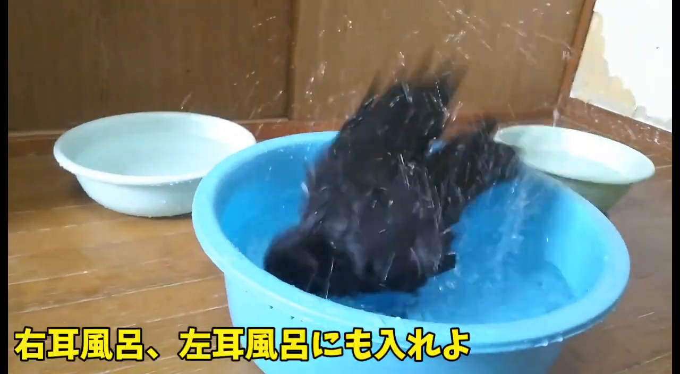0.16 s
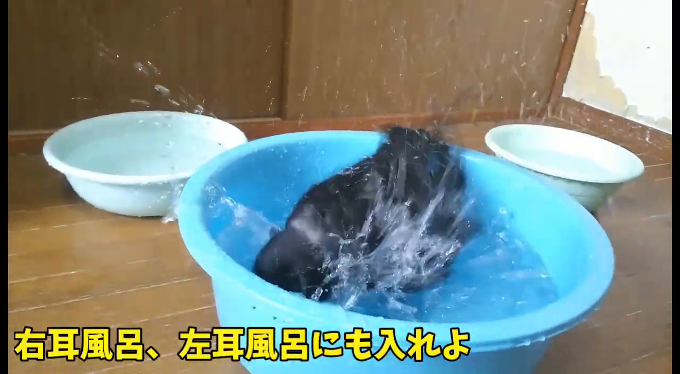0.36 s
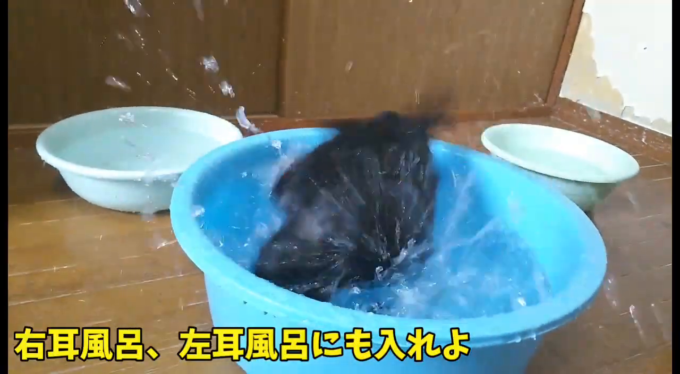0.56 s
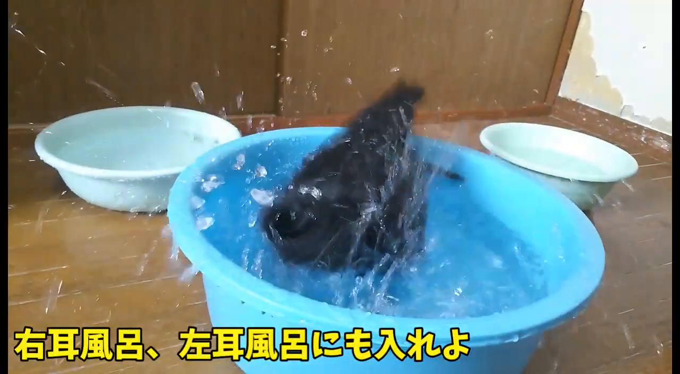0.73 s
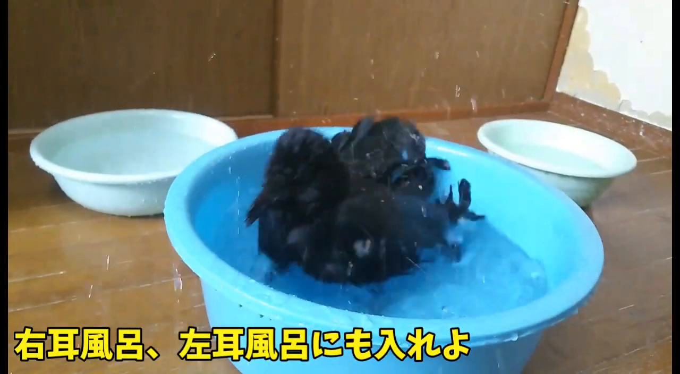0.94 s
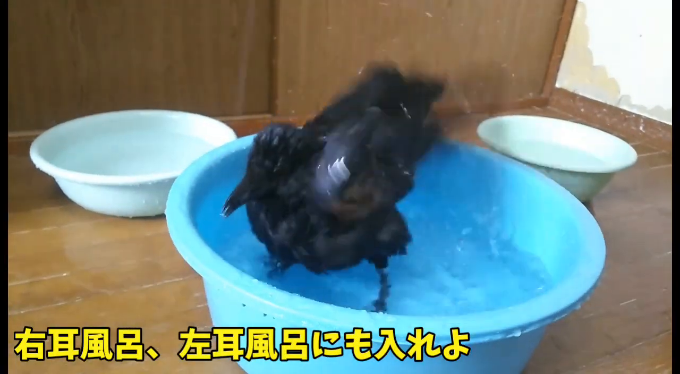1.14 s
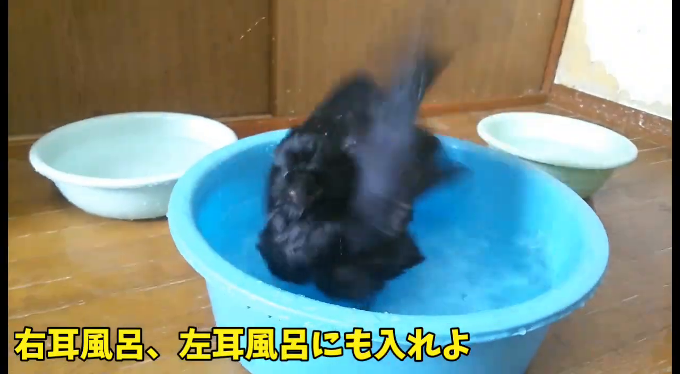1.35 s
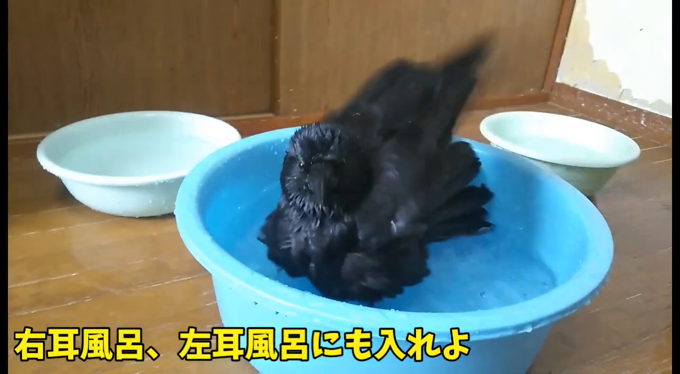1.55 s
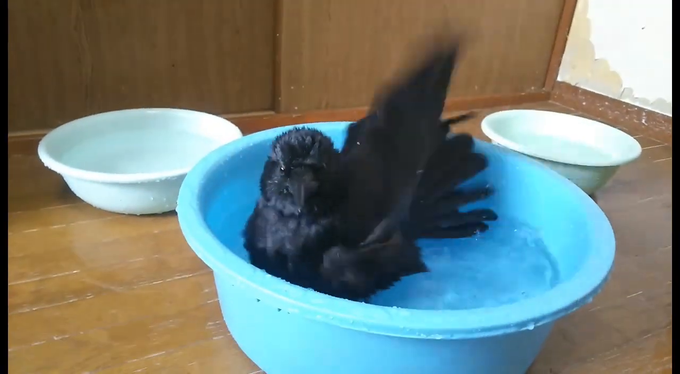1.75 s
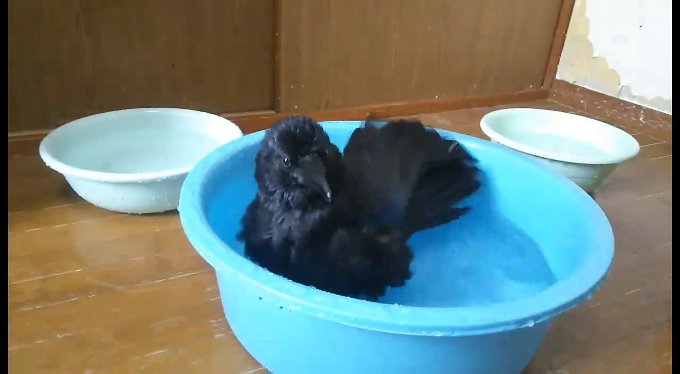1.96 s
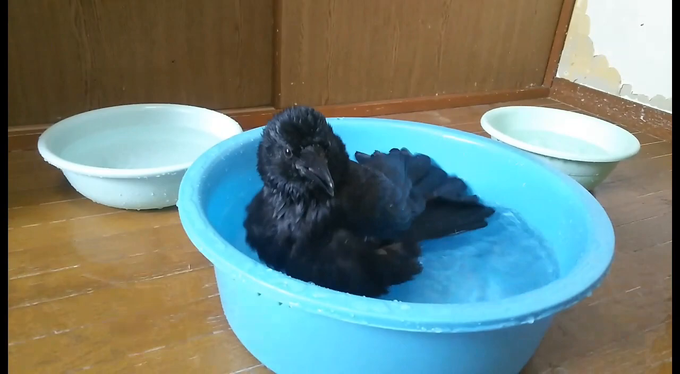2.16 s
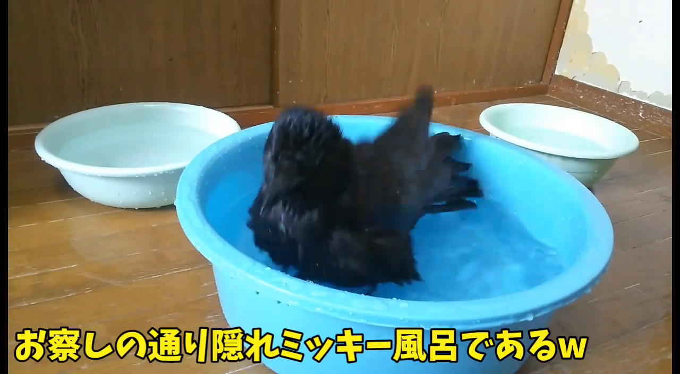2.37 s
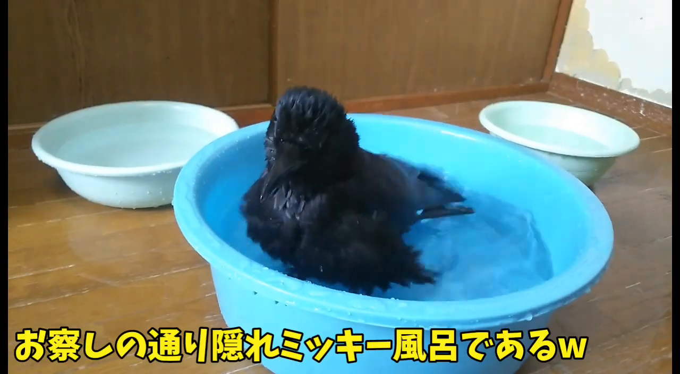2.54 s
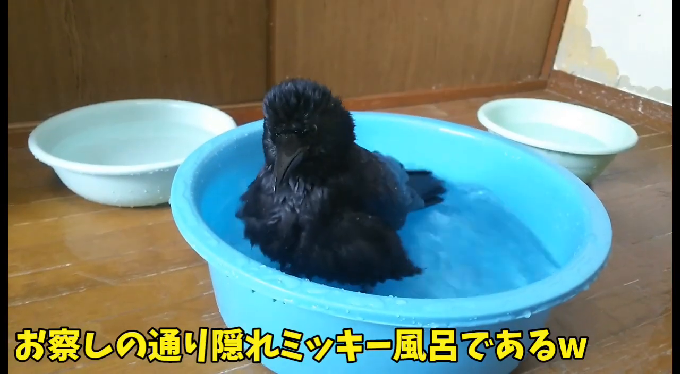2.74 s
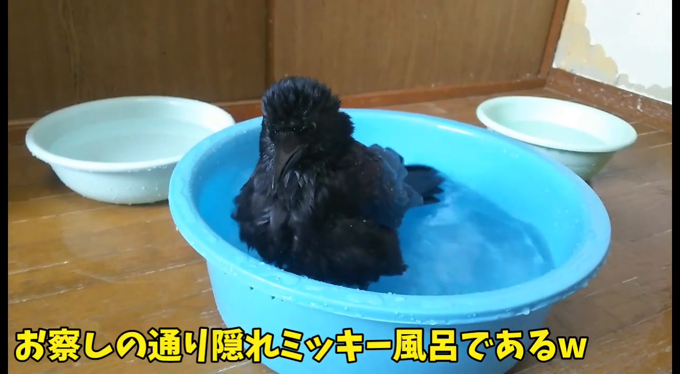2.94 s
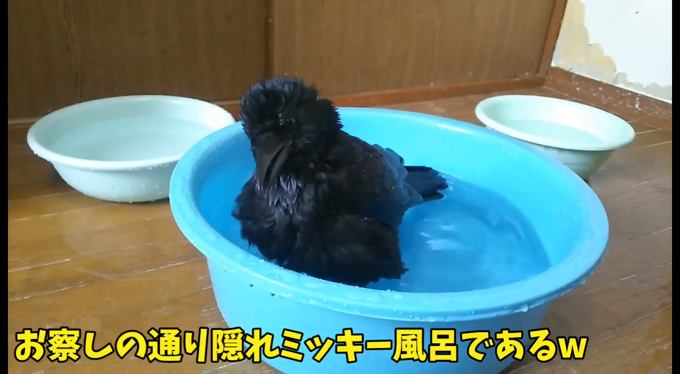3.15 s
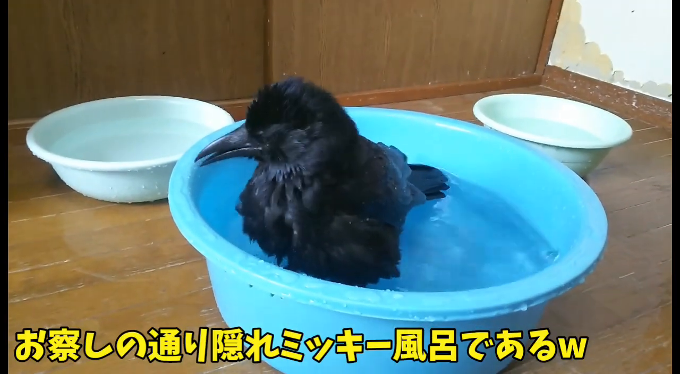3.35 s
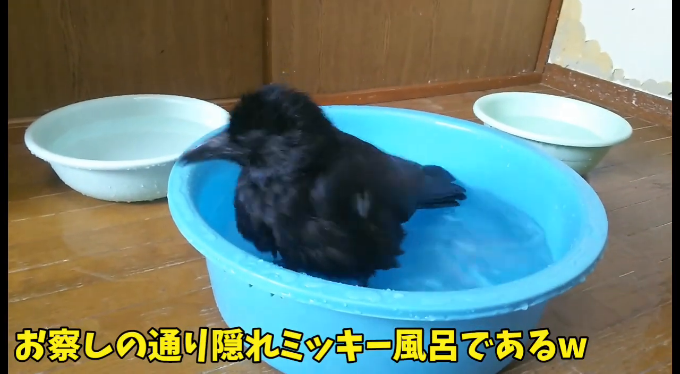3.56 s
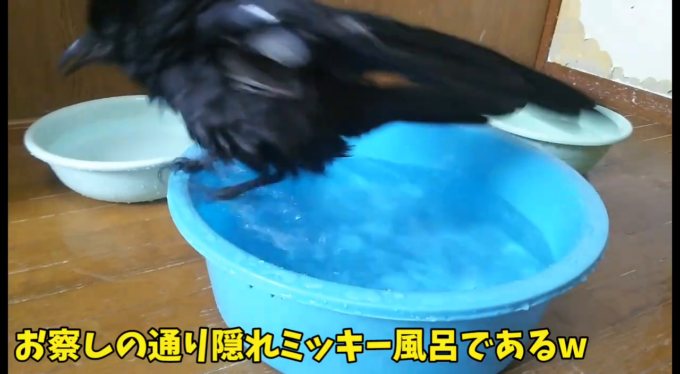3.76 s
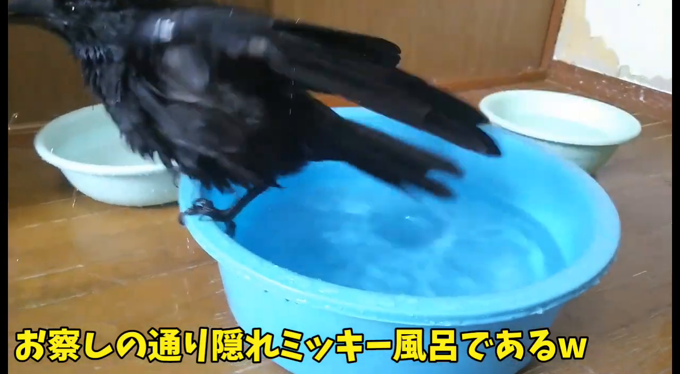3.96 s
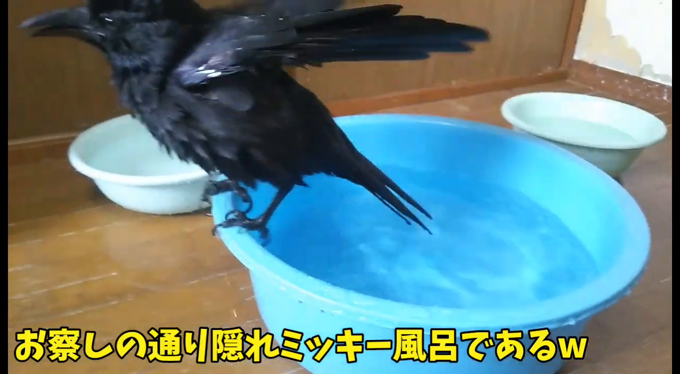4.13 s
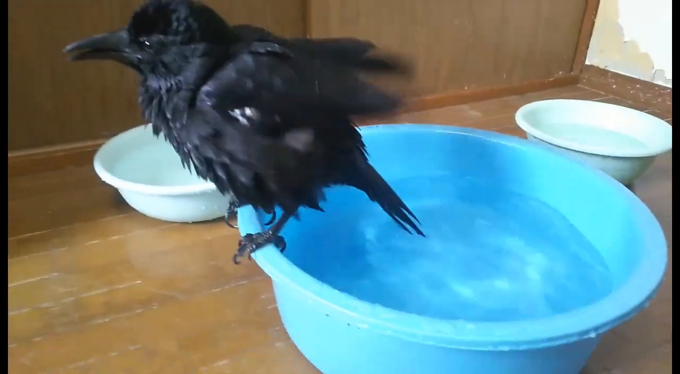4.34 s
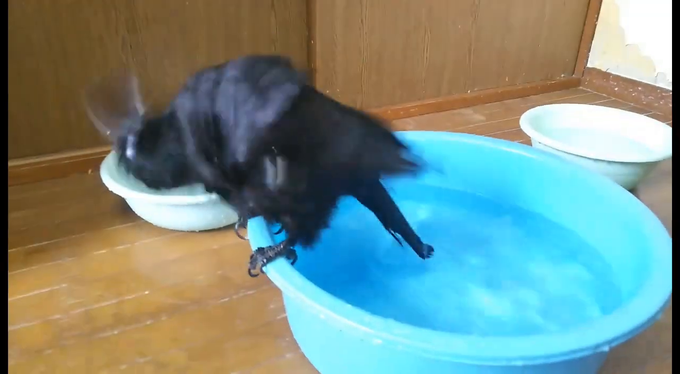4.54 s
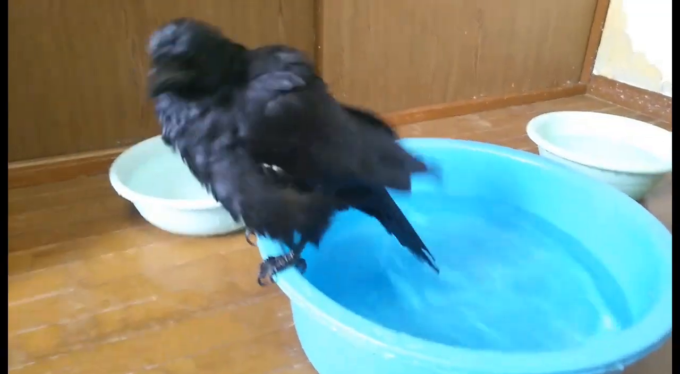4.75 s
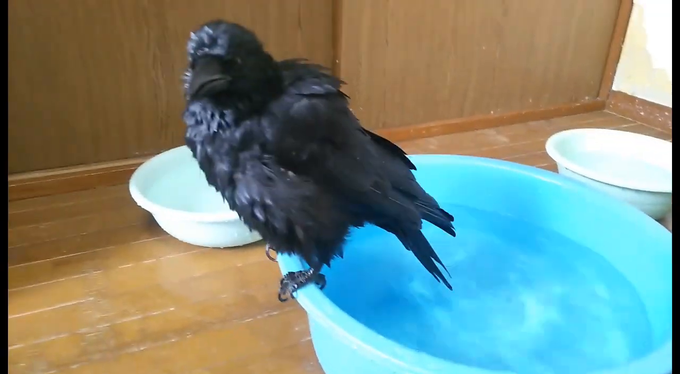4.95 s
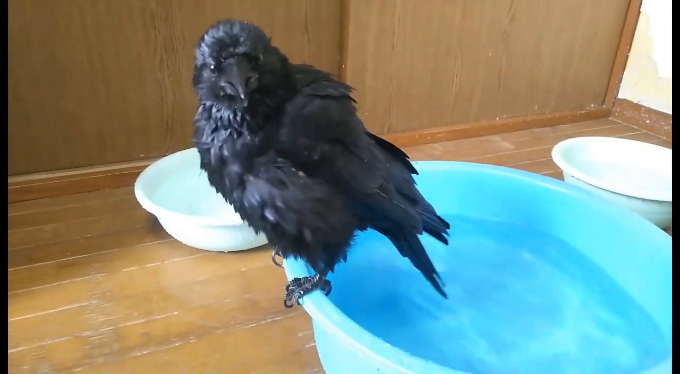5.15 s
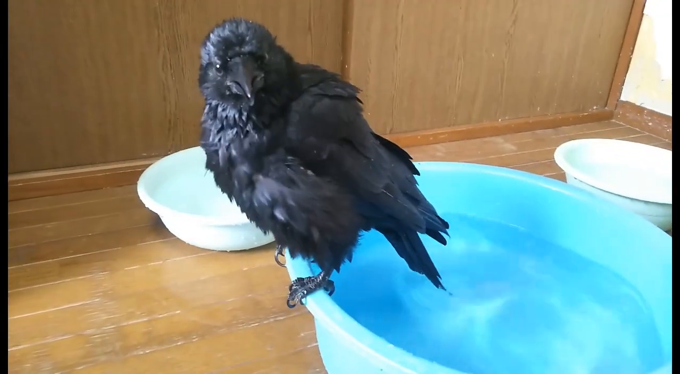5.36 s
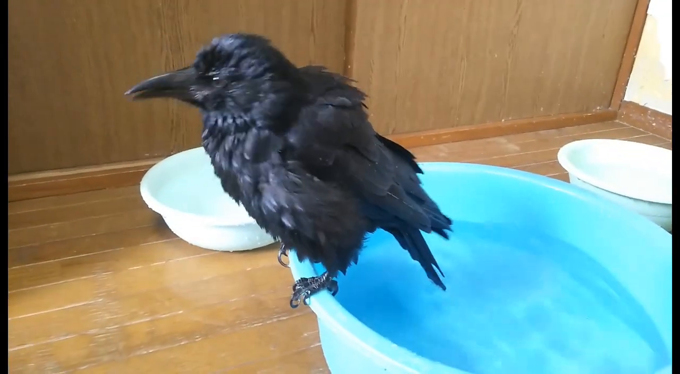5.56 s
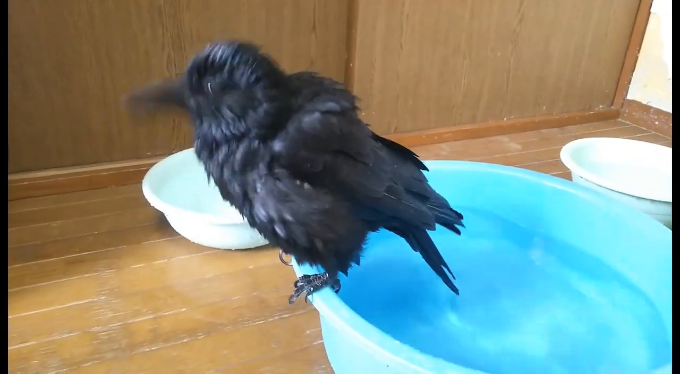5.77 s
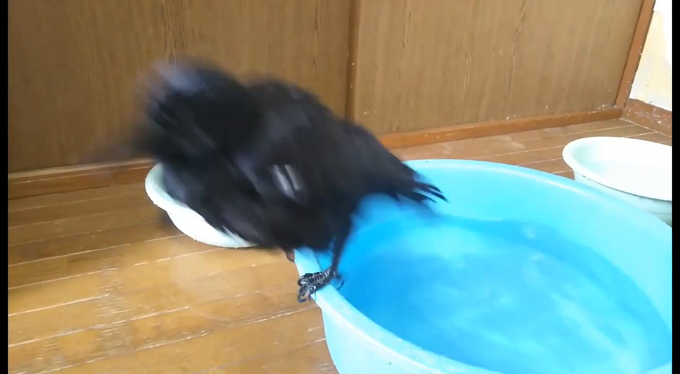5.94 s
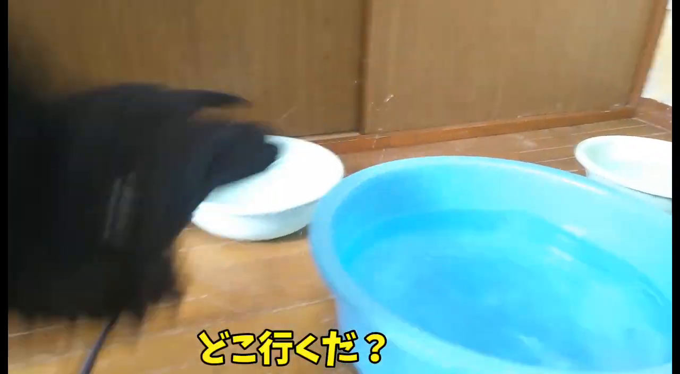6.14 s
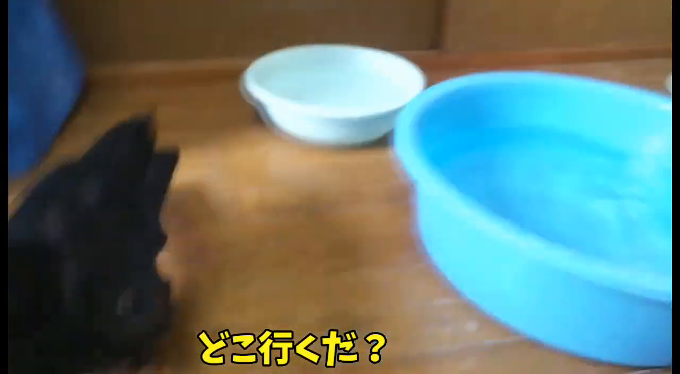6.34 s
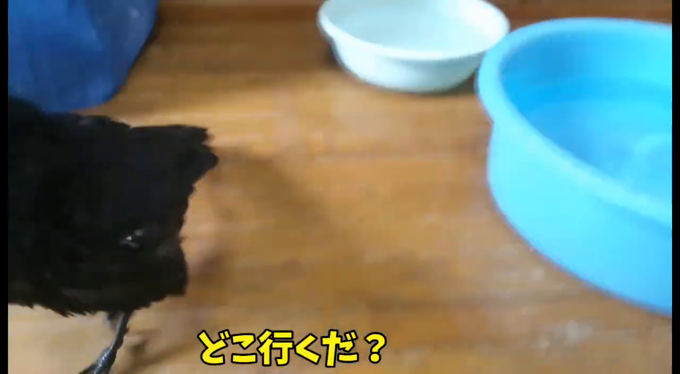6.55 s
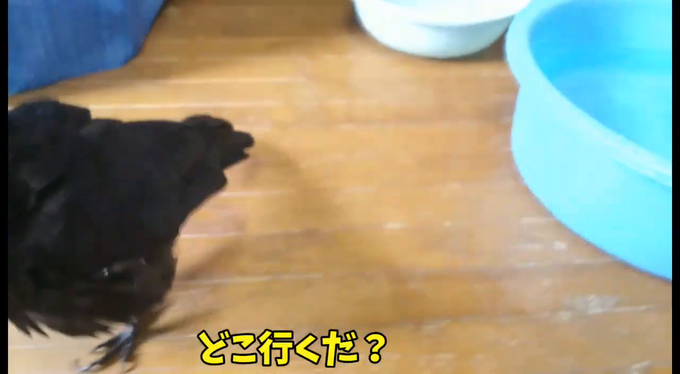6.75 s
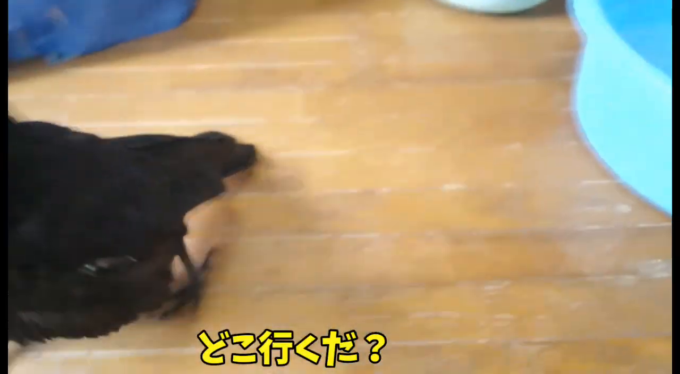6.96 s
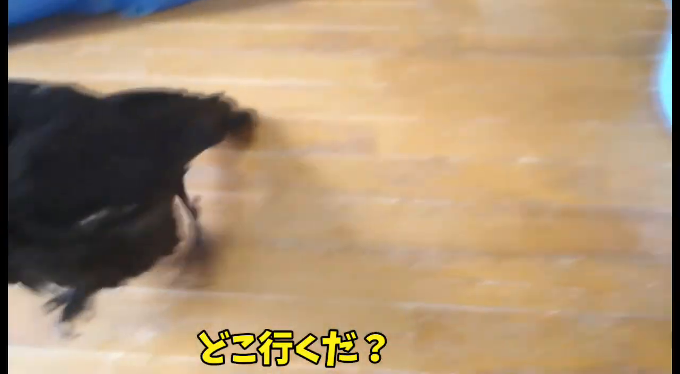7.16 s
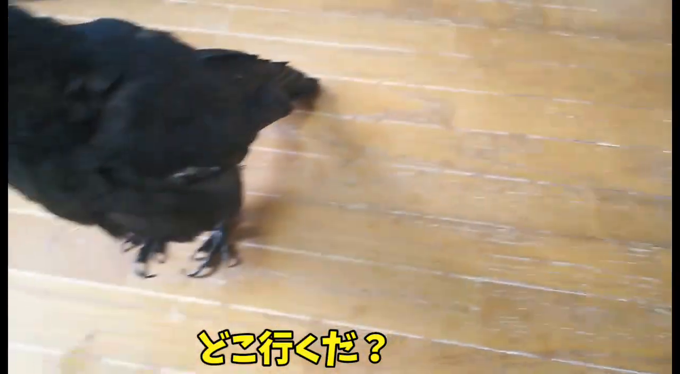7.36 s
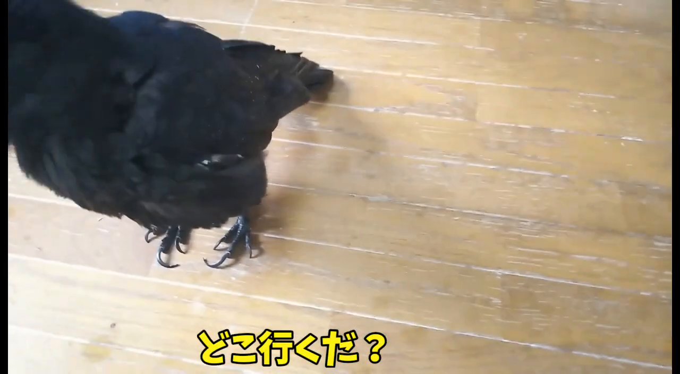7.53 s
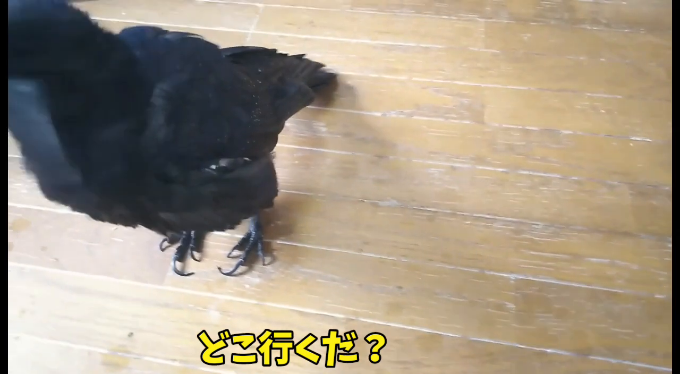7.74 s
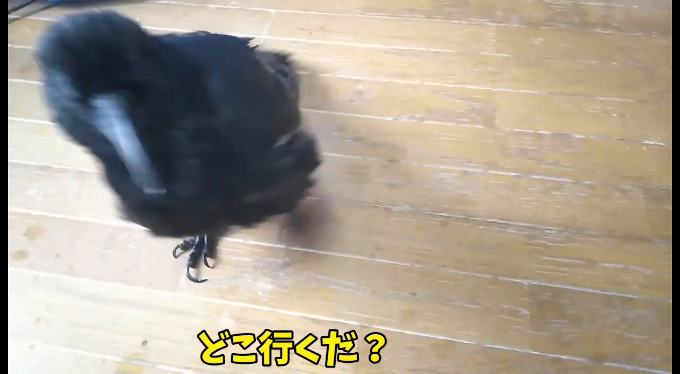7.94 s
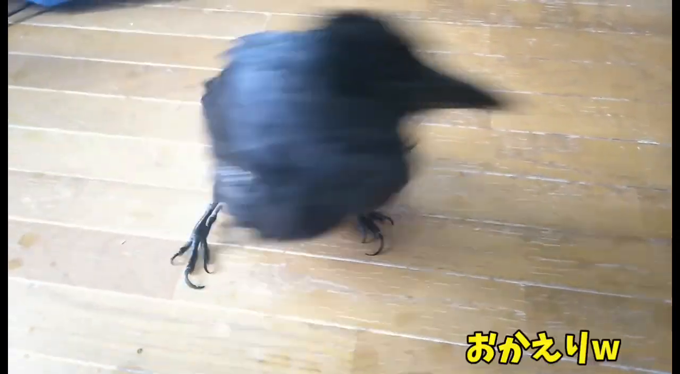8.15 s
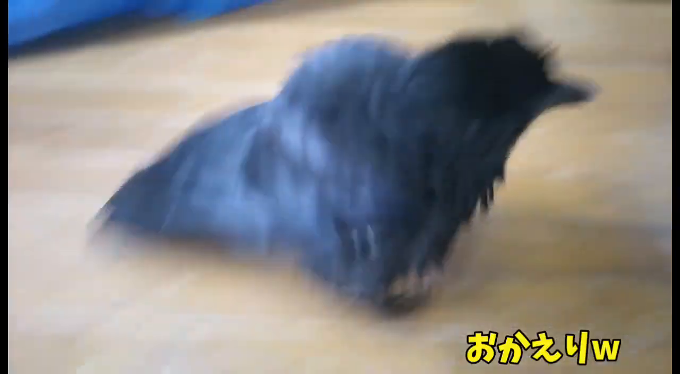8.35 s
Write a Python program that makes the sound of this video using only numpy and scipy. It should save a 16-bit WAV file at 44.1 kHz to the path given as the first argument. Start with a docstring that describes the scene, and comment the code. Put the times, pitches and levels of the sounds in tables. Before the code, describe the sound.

A crow bathes noisily in a plastic tub indoors, slapping and plopping water, then grips the rim, shakes, and walks off on wooden boards with ticking claws.

```python
"""Indoors, a small bare room with a wooden floor, on a two-port microphone: room tone and a faint hum all along.
First a crow bathes in a plastic tub: wings slap the water, trapped air pockets plop, spray ticks and fizzes.
After single drops and a last flurry of slaps it grips the rim, while road noise outside begins to swell.
It shakes its wet feathers, touches the rim again, hops to the floor and walks: claws tick, boards ring.
Noise bursts make the cracks, decaying sines the plops and rings; decaying noise makes the echoes of each hit."""
import sys
import numpy as np
from scipy import signal
from scipy.fft import rfft, irfft
from scipy.io import wavfile
from scipy.ndimage import uniform_filter1d

SR = 44100
rng = np.random.default_rng(int(sys.argv[2]) if len(sys.argv) > 2 else 0)


def wav_record(signal):
    """Record a signal, one row per channel, as 16-bit PCM in the file named by sys.argv[1]."""
    frames = np.transpose(np.atleast_2d(signal))
    bounded = np.clip(frames, -1, 1)
    # unit amplitude maps onto the largest positive 16-bit level
    quanta = np.round(bounded * 32767).astype(np.int16)
    wavfile.write(sys.argv[1], SR, quanta)


N = 370440
T = np.arange(N) / SR  # seconds

# All levels and gains are relative dB unless stated; colours are spectral weights on white noise.
# Room tone. Each row: frequency in Hz, weight in dB.
TONE_COLOUR = [(18, -52), (40, -3), (200, -6.5), (2500, -22.5), (9000, -30.5), (14000, -24.5)]
TONE_DB = -58  # rms
HUM_HZ, HUM_DB = 301.5, -69.5  # centre pitch, rms before its level wavers
# Road noise heard through the wall. Each row: time in seconds, level in dB.
ROAD_LEVEL = [(3.3, -81), (4.2, -53.5), (4.9, -59), (5.75, -56), (6.3, -53), (6.9, -46), (7.4, -44),
              (8.0, -42.5), (8.4, -46)]
# Its colour. Each row: frequency in Hz, weight in dB.
ROAD_COLOUR = [(18, -48), (35, -3), (95, -5.5), (330, -8), (600, -10), (820, -4.5), (1150, -8),
               (1850, -9.5), (2400, -16.5), (11000, -28.5)]
# Wavering drones in the road noise. Each row: centre pitch in Hz, level in dB against the noise.
ROAD_DRONES = [(96, -15.5), (382, -17), (755, -16), (860, -17)]

# Echo tails of the room. Each row: band centre in Hz, time to fall 60 dB in seconds, level in dB.
ROOM_BANDS = [(99, 0.14, -11.5), (278, 0.25, 2.5), (864, 0.23, 0.5), (2810, 0.38, 1.5), (9100, 0.41, -0.5)]
# Stereo width of diffuse sound. Each row: frequency in Hz, side against mid in dB.
STEREO_WIDTH = [(60, -5), (200, -10.5), (700, -3), (1300, 1), (15000, -1)]
# Microphone response. Each row: frequency in Hz, gain in dB.
MIC_RESPONSE = [(20, -22), (55, 0), (9300, 7), (10500, -2.5), (13500, -2), (14600, -82)]
# Colour of the left port, opposite on the right. Each row: frequency in Hz, gain in dB.
PORT_LEAN = [(300, 0), (4000, -1), (12000, 1.5)]
TOP_HZ, SQUASH = 15200, 1.05  # microphone cutoff, drive of the peak rounding

# Spray thrown up while bathing. Each row: time in seconds, level in dB.
BATH_LEVEL = [(0, -32), (.14, -50), (.45, -31), (.6, -34.5), (.85, -26.5), (1.0, -37), (1.5, -43),
              (2.2, -58.5), (2.85, -65)]
# Wet feathers shaken or lifted out of the water. Each row: start in seconds, hold in seconds, level in dB.
SHAKES = [(2.37, 0.084, -57.5), (3.771, 0.065, -47), (3.942, 0.007, -31.5), (4.67, 0.0055, -48),
          (4.744, 0.02, -51), (6.07, .045, -55.5)]
RISE_DB_PER_S, FALL_DB_PER_S = 260, 164
# Droplet ticks. Each row: frequency in Hz, weight in dB.
SPRAY_COLOUR = [(700, -62), (1300, 3), (3000, 4), (8900, 2.5), (14000, 8.5)]
# Churning water. Each row: frequency in Hz, weight in dB.
CHURN_COLOUR = [(50, -49), (85, 6), (230, -7), (1100, -4.5), (1900, -30)]
CHURN_DB, CHURN_LAG_S = -9, 0.037  # the water in the tub follows the spray sluggishly
BOOM_DB, BOOM_S = 41.5, 0.27  # level before the churning squares it down, averaging time
# Clouds of like-sized small bubbles, left by sheets of water falling back.
# Each row: start in seconds, length in seconds, level in dB, centre pitch in Hz.
BUBBLE_CLOUDS = [(0.097, 0.049, -28, 2220), (0.427, 0.025, -14, 3560), (0.918, 0.09, -16, 2980),
                 (3.899, 0.24, -22.5, 1048)]
CLOUD_SPREAD_OCT, CLOUD_CYCLES, CLOUD_FADE_DB = 0.13, 4.6, 20
FIZZ_DB, FIZZ_HZ, FIZZ_OCT = 8, 1500, 2.45  # top level over the spray, lowest pitch, range in octaves

# Feet on the tub rim. Each row: time in seconds, claw level in dB, low push in dB, wall ring in dB,
# sharpness in dB.
GRIPS = [(4.2, -33, -24.5, -38, -9.5), (4.2286, -10, -31, -40.5, 3), (4.4011, -32.5, -31.5, -41.5, -7),
         (4.4367, -17, -34, -45.5, 0), (6.107, -22, -51, -43, -2), (6.1208, -8, -38, -22.5, -3)]
# Feet on the floor boards. Each row: time in seconds, claw level in dB, board ring in dB, sharpness in dB,
# scrape decay in ms.
STEPS = [(6.3856, -6.5, -24, -8, 7.1), (6.4067, -1.5, -20.5, 6, 16), (6.5568, -11.5, -66, -5, 3.6),
         (6.726, -23, -51, 6, 13), (6.751, -20.5, -38, 12.5, 10), (7.092, -13, -40, 10, 8.),
         (7.1117, -16, -41, -11, 15), (7.262, -24, -58, 2, 17), (7.346, -4, -31, -9, 6.3),
         (8.2071, -15.5, -54, -6, 9.8), (8.226, -15, -31.5, -15, 20.6)]
# Modes of the tub wall, the low push first. Each row: pitch in Hz, level in dB, 60 dB decay in seconds.
WALL_MODES = [(137.4, -7.5, 0.16), (352, -1.5, 0.17), (426, 2.5, 0.068), (781, -7, 0.14),
              (1160, 11.5, 0.079)]
# Modes of the floor boards, the low push first. Each row: pitch in Hz, level in dB, 60 dB decay in seconds.
BOARD_MODES = [(128.3, -8.5, 0.18), (272, -2.5, 0.11), (387, 8.5, 0.033), (599, -7.5, 0.06),
               (1387, -2.5, 0.058)]
RIM_SCRAPE_MS, CLAW_RISE_MS = 5.2, 0.76
RIM_TREBLE_DB, FLOOR_TREBLE_DB = 6, 2.5
WEIGHT_LAG_S = 0.00293  # the weight comes down just after the claws touch
HEAVY_DB, HEAVY_SLOPE = 32.5, 2  # the low board mode grows faster with weight than the others

# Wing and body slaps on the water. Each row: time in seconds, crack level in dB, plop level in dB,
# plop starting pitch in Hz, sharpness in dB, tub slosh in dB.
SLAPS = [(0.0034, -17.5, -38.5, 700, 23, -33), (0.0773, -20, -23.5, 1004, -4, -22.5),
         (0.0993, -44, -33, 560, 8, -31), (0.177, -17, -30, 1130, -20, -33),
         (0.208, -11.5, -30.5, 686, -5, -34.5), (0.313, -18.5, -24, 1030, -1, -33.5),
         (0.3675, -10, -31, 500, -23.5, -27), (0.4271, -6.5, -33.5, 1085, 9.5, -28.5),
         (0.532, -6.5, -26.5, 990, -2, -29), (0.626, -4.5, -13, 947, -36, -24),
         (0.6441, -11.5, -19, 672, 10, -22), (0.732, -2.5, -26, 514, -31, -25.5),
         (0.8059, -9, -17.5, 895, 10, -26), (0.9085, -11, -30.5, 970, -13, -34.5),
         (1.054, -21, -28.5, 1040, -4, -28.5), (1.2096, -11.5, -22.5, 683, -41, -26.5),
         (1.2265, -13.5, -33, 966, 18, -29.5), (1.3738, -12, -30.5, 763, -14, -26.5),
         (1.4312, -12, -38, 1070, 18, -31.5), (1.5663, -9, -21, 1003, 10.5, -25.5),
         (1.725, -25.5, -48, 690, 4, -46), (1.7699, -13, -27, 730, -14, -35),
         (1.807, -11.5, -52, 1040, 4, -39), (1.9487, -19, -32.5, 850, 6, -35),
         (2.135, -28.5, -55, 660, -2, -47), (2.533, -25.5, -41.5, 970, 12.5, -42.5),
         (3.79, -47, -43, 424, -18, -41.5), (3.8977, -2, -19, 1040, 11, -59),
         (3.922, -9.5, -19, 1006, -1, -43), (3.9686, -8, -27, 1160, 15, -29)]
# Single drops and gulps. Each row: time in seconds, level in dB, starting pitch in Hz, decay in cycles.
DRIPS = [(0.51, -25, 1000, 5), (2.192, -33, 3350, 4.7), (2.673, -45, 1044, 13), (4.409, -26, 410, 2.5)]
# Modes of the water-loaded tub bottom. Each row: pitch in Hz, level in dB, 60 dB decay in seconds.
BOTTOM_MODES = [(87.2, -10.5, 0.18), (138.8, -2, 0.14), (196.5, 2.5, 0.043), (334.6, -4, 0.13)]
SLAP_TREBLE_DB, SLAP_RISE_MS = 0.5, 1.27
POCKET_CYCLES, POCKET_GLIDE = 2.9, .15  # decay, pitch rise as a share per decay
MODE_SCATTER = .025  # share of pitch a blow shifts a mode
TWIN, TWIN_APART = .5, .04  # depth of beating, slowest beat as a share of the pitch


def undb(db):
    """Turn dB into an amplitude gain."""
    return 10 ** (np.asarray(db) / 20)


def level(x, db):
    """Scale to an rms level."""
    return x * undb(db) / np.sqrt(np.mean(x ** 2))


def colour(x, points):
    """Weight the spectrum by (Hz, dB) points, joined along log frequency."""
    hz, db = np.transpose(points)
    bins = np.arange(x.shape[-1] // 2 + 1) * SR / x.shape[-1] + 1
    gain = undb(np.interp(np.log(bins), np.log(hz), db))
    return irfft(rfft(x) * gain, x.shape[-1])


def diffuse(size):
    """Two-channel noise, alike in the bass and nearly unrelated in the treble."""
    mid, side = rng.standard_normal((2, size))
    return mid + colour(side, STEREO_WIDTH) * np.array([[1], [-1]])


def walk(rate):
    """A random wander around zero: a new level every 1 / rate seconds, smoothed twice."""
    k = int(SR / rate)
    held = np.repeat(rng.standard_normal(N // k + 1), k)
    return uniform_filter1d(uniform_filter1d(held, k), k)[:N]


def add(out, sound, s):
    """Mix a two-channel or mono sound in at a time in seconds."""
    i = int(s * SR)
    n = min(sound.shape[-1], N - i)
    out[:, i:i + n] += sound[..., :n]


def drone(hz, db):
    """A tone whose pitch and level waver."""
    wavering_hz = hz * (1 + 0.014 * walk(12))
    tone = np.sin(2 * np.pi * np.cumsum(wavering_hz) / SR)
    return level(tone, db) * undb(2 * walk(3.1))


def road():
    """Coloured noise and drones from outside that swell together and flicker."""
    noise = level(colour(diffuse(N), ROAD_COLOUR), 0)
    drones = sum(drone(hz, db) for hz, db in ROAD_DRONES)
    s, db = np.transpose(ROAD_LEVEL)
    return (noise + drones) * undb(np.interp(T, s, db) + walk(5.1))


def background():
    """Steady room tone from coloured noise, a wavering hum, and the road."""
    tone = level(colour(diffuse(N), TONE_COLOUR), TONE_DB)
    return tone + drone(HUM_HZ, HUM_DB) + road()


def echoes():
    """Diffuse echoes that build up in under a millisecond and die at their own rate in each band."""
    t = T[:SR // 2]
    tail = 0
    for hz, t60, db in ROOM_BANDS:
        band = colour(diffuse(len(t)), [(hz / 5, -40), (hz / 1.64, 0), (hz * 1.79, 0), (hz * 5, -40)])
        tail = tail + undb(db) * band * 1000 ** (-t / t60)
    return tail * np.clip(t / 0.0007, 0, 1) * undb(-33.5)


def room(x, count=4):
    """Echoes of the bird's sound: a few noise tails take quick turns, so no single echo colour stands out."""
    turn = np.arange(N) // 300 % count  # the next tail every 300 samples
    wet = 0
    for k in range(count):
        part = (x[0] * (turn == k))[None]
        wet = wet + signal.fftconvolve(part, echoes(), axes=1)[:, :N]
    return wet


def wetness():
    """Gain of flying water: the bath, then each shake as rise, hold and fall, summed as power."""
    power = undb(np.interp(T, *np.transpose(BATH_LEVEL), right=-120)) ** 2
    for s, hold, db in SHAKES:
        rise = RISE_DB_PER_S * np.maximum(s - T, 0)
        fall = FALL_DB_PER_S * np.maximum(T - s - hold, 0)
        power = power + undb(db - rise - fall) ** 2
    return np.sqrt(power)


def droplets():
    """Dense random ticks of uneven size; each size range, heard as a band, surges alone."""
    size_db = np.minimum(3.7 * rng.exponential(size=(2, N)), 14.5)
    hits = rng.random((2, N)) < 1300 / SR  # 1300 a second on average
    ticks = colour(hits * undb(size_db) * rng.standard_normal((2, N)), SPRAY_COLOUR)
    drops = 0
    for hz in (1560, 3020, 5600, 7500, 11340):
        band = colour(ticks, [(hz / 2.2, -20), (hz, 0), (hz * 2.2, -20)])
        drops = drops + band * undb(6.0 * walk(22))
    return level(drops, 0) * undb(2.8 * walk(30.23))


def churning(wet):
    """Rumble of stirred water that lags the spray."""
    churn = level(colour(diffuse(N), CHURN_COLOUR), 0) * undb(2.5 * walk(22))
    step = 1 / (CHURN_LAG_S * SR)
    stir = signal.lfilter([step], [1, step - 1], wet, zi=wet[:1])[0]
    return churn * stir * undb(CHURN_DB)


def tub_boom(wet):
    """Hard churning keeps the tub bottom booming: noise around its lowest mode, growing as churning squared."""
    hz = BOTTOM_MODES[0][0]
    noise = colour(rng.standard_normal(N), [(hz / 1.4, -40), (hz, 0), (hz * 1.53, -40)])
    drive = uniform_filter1d(wet * undb(CHURN_DB), int(BOOM_S * SR))
    return level(noise, BOOM_DB) * drive ** 2


def spray():
    """Droplet ticks over the rumble and boom of churning water."""
    wet = wetness()
    return droplets() * wet + churning(wet) + tub_boom(wet)


def bubble(hz, cycles, glide=0.016):
    """An air pocket rings, decaying over some cycles, and rises in pitch."""
    turns = hz * T[:int(5 * cycles * SR / hz)]
    tone = np.sin(2 * np.pi * turns * (1 + glide * turns / (2 * cycles)))
    return tone * np.exp(-turns / cycles) * (1 - np.exp(-2 * turns))


def fizz():
    """Small bubbles ring briefly: clouds of like size, and single ones of any size wherever spray lands."""
    out, wet = np.zeros((2, N)), wetness()
    for s, length, db, hz in BUBBLE_CLOUDS:
        for late, size, tune, side in rng.random((40, 4)):
            pitch = hz * 2 ** (CLOUD_SPREAD_OCT * (2 * tune - 1))
            gain = undb(db - CLOUD_FADE_DB * late ** 2 - 10 * size)
            pocket = bubble(pitch, CLOUD_CYCLES) * gain
            add(out, pocket * np.array([[1 - side], [side]]), s + length * late)
    for when, size, tune, side in rng.random((1600, 4)):
        gain = undb(FIZZ_DB - 40 * size) * wet[int(when * N)]
        pocket = bubble(FIZZ_HZ * 2 ** (FIZZ_OCT * tune), 1.64) * gain
        add(out, pocket * np.array([[1 - side], [side]]), when * N / SR)
    return out


def ring(modes, push_ms, chance):
    """Decaying modes started by a soft push; chance shifts their pitch, and each beats as with close twins."""
    t = T[:SR // 2]
    twin = rng.random((len(modes), 2))
    total = 0
    for (hz, db, t60), c, (apart, phase) in zip(modes, chance, twin):
        tone = np.sin(2 * np.pi * hz * (1 + MODE_SCATTER * c) * t)
        beat = 1 + TWIN * np.sin(2 * np.pi * (TWIN_APART * hz * (1 + apart) * t + phase))
        total = total + undb(db) * tone * 1000 ** (-t / t60) * beat
    return (1 - np.exp(-t * 1000 / push_ms)) * total


def crack(rise_ms, ms, sharp_db, tilt_db, low_hz, tick_db=7.0):
    """A tick as strong as the contact is sharp, then a grainy trail; each microphone port hears other detail."""
    t = T[:8192] * 1000  # ms
    grain = np.minimum(rng.exponential(size=len(t) // 64), 3).repeat(64)  # separate droplets or grit
    noise = diffuse(len(t)) * undb(3.7 * grain)
    shape = (1 - np.exp(-t / rise_ms)) * np.exp(-t / max(ms, .5))
    trail = noise * shape
    # equal energy in every trail of one shape
    burst = trail * np.sqrt(np.sum(shape ** 2) / np.sum(trail ** 2, axis=1, keepdims=True))
    burst[[0, 1], rng.integers(0, 8, size=2)] += undb(sharp_db + tick_db)
    # a one-pole low-pass splits the burst; tilt_db sets the treble against the rest
    dull = signal.lfilter(*signal.butter(1, 3000., fs=SR), burst)
    tilted = 0.26 * (dull + undb(tilt_db) * (burst - dull))
    return signal.sosfilt(signal.butter(2, low_hz, "high", fs=SR, output="sos"), tilted)


def feet(table, modes, push_ms, treble_db):
    """Claws tick and scrape; the weight rings what they land on, the top mode less when the contact is dull."""
    out = np.zeros((2, N))
    for s, db, low_db, ring_db, sharp_db, ms in table:
        chance = rng.standard_normal(len(modes))
        claw = crack(CLAW_RISE_MS, ms, sharp_db, treble_db, 270.0)
        # claws have little of the very top that droplets give
        claw = signal.lfilter(*signal.butter(1, 9000., fs=SR), claw)
        add(out, undb(db) * claw, s)
        add(out, undb(low_db + 5.0) * ring(modes[:1], 3 * push_ms, chance), s + WEIGHT_LAG_S)
        add(out, undb(ring_db) * ring(modes[1:-1], push_ms, chance[1:]), s + WEIGHT_LAG_S)
        top_db = ring_db + 2 * min(sharp_db, 0)
        add(out, undb(top_db) * ring(modes[-1:], push_ms, chance[-1:]), s)
    return out


def rim_feet():
    """Claws grip the tub rim and ring the plastic wall."""
    grips = [row + (RIM_SCRAPE_MS,) for row in GRIPS]
    return feet(grips, WALL_MODES, 4.2, RIM_TREBLE_DB)


def floor_feet():
    """Hops and steps ring the boards; the low push follows from the ring level."""
    steps = [(s, db, HEAVY_DB + HEAVY_SLOPE * ring_db, ring_db, sharp_db, ms)
             for s, db, ring_db, sharp_db, ms in STEPS]
    return feet(steps, BOARD_MODES, 2.65, FLOOR_TREBLE_DB)


def drips():
    """Single drops and gulps, each one ringing air pocket."""
    out = np.zeros((2, N))
    for s, db, hz, cycles in DRIPS:
        add(out, undb(db) * bubble(hz, cycles), s)
    return out


def slaps():
    """Each slap cracks, traps a cluster of air pockets and shakes the filled tub."""
    out = np.zeros((2, N))
    for s, db, plop_db, hz, sharp_db, slosh_db in SLAPS:
        add(out, undb(db) * crack(SLAP_RISE_MS, 18.2, sharp_db, SLAP_TREBLE_DB, 560.0), s)
        chance = 2 * rng.standard_normal(len(BOTTOM_MODES))
        add(out, undb(slosh_db) * ring(BOTTOM_MODES, 5.0, chance), s)
        # the pocket under the wing bursts first
        add(out, undb(plop_db + 7.5 + sharp_db / 2) * bubble(hz, 2.2), s)
        for late, size, tune, side in rng.random((11, 4)):
            # the first pockets are alike; later ones scatter in size, mostly larger
            pitch = hz * 2 ** (late ** 0.557 * (1.92 * tune - 1.3))
            gain = undb(plop_db - 5.8 * late - 7.6 * size)
            pocket = bubble(pitch, POCKET_CYCLES, POCKET_GLIDE) * gain
            add(out, pocket * np.array([[0.5 + side], [1.5 - side]]), s + .045 * late ** 1.6)
    return out


def scene():
    """The background, the bird's direct sound and its echoes."""
    bird = spray() + fizz() + rim_feet() + floor_feet() + drips() + slaps()
    return background() + bird + room(bird)


def record(dry):
    """The microphone loses the deepest bass and the top; its ports differ a little in colour; peaks are rounded."""
    left = colour(dry[0], PORT_LEAN)
    right = colour(dry[1], [(hz, -db) for hz, db in PORT_LEAN])
    heard = colour(np.array([left, right]), MIC_RESPONSE)
    rounded = np.tanh(SQUASH * heard) / SQUASH
    return signal.sosfilt(signal.ellip(8, .2, 70, TOP_HZ, fs=SR, output="sos"), rounded)


dry = scene()
out = record(dry)
wav_record(out)
```